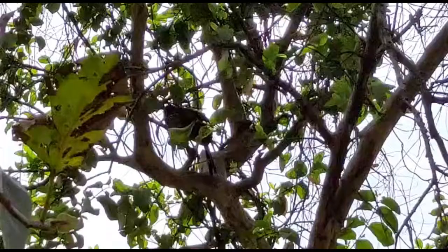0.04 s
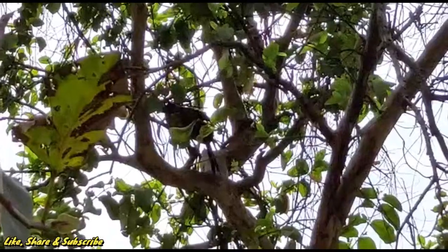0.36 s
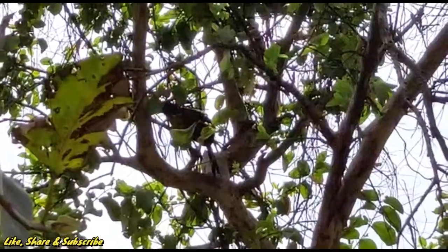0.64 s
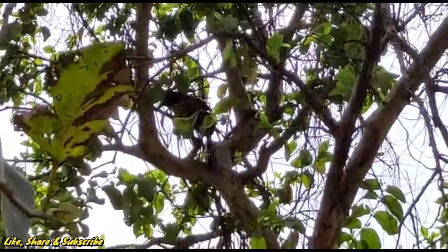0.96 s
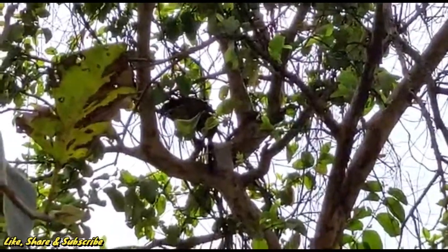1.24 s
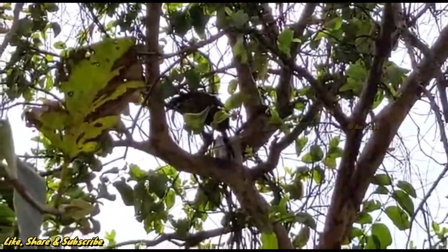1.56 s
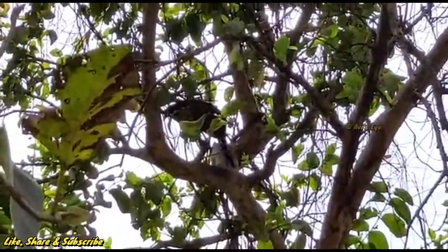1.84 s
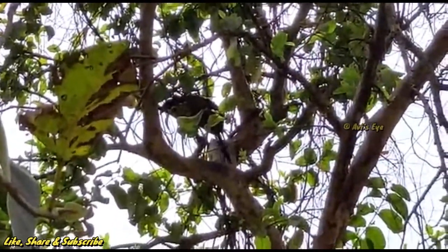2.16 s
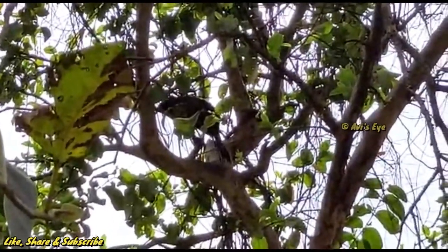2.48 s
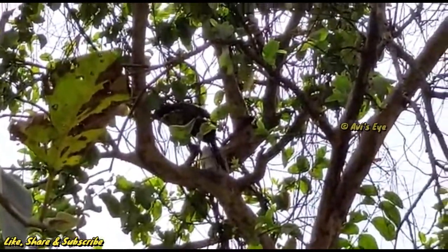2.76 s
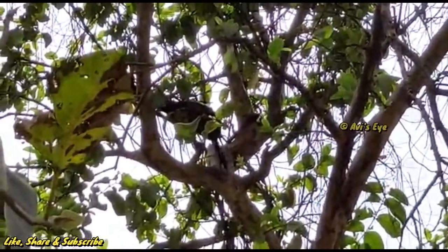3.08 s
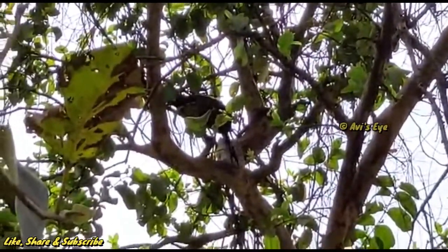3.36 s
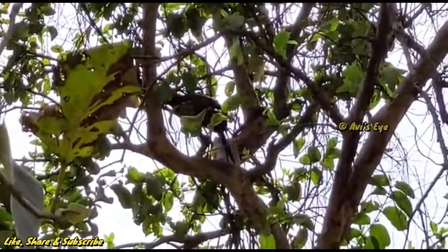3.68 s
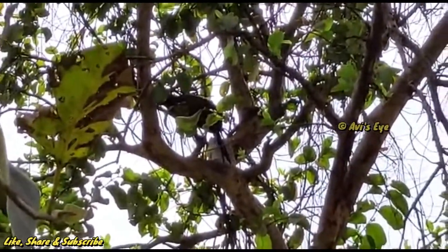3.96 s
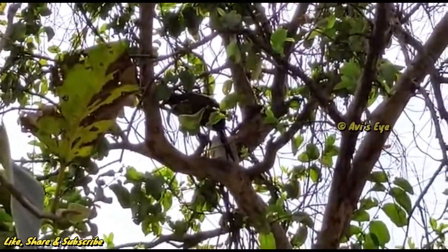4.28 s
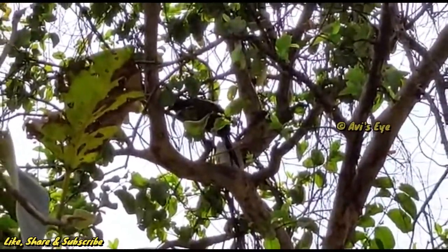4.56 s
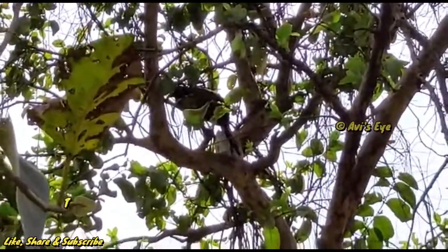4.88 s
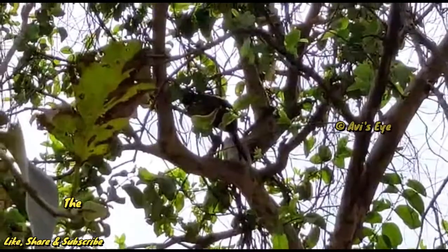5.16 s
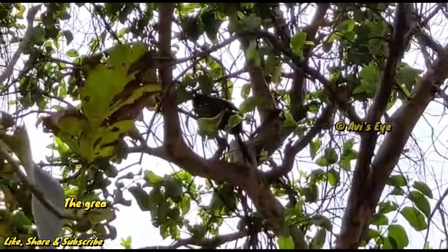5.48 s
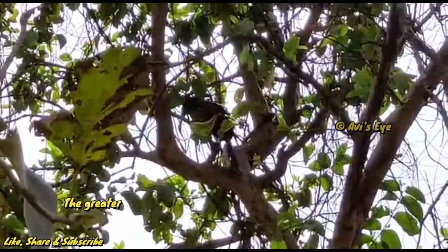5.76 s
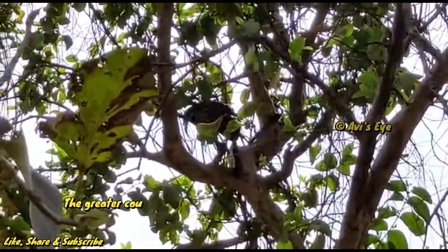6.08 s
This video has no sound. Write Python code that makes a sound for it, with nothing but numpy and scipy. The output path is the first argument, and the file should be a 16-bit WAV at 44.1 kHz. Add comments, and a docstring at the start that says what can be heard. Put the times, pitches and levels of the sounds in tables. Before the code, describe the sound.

Five low, evenly spaced bird hoots sound outdoors above a soft wash of traffic and thin twittering.

```python
"""A steady wash of city traffic fades in, with an idling engine, faint horns and a thin high hiss.
Small birds chip further off, and far twittering and faint insect tones come up behind them.
From 1.3 to 3 s a coucal in a tree gives five deep, almost pure hoots from its swollen throat, each
dipping in pitch and rising again; ground and house walls throw them back, so they beat against their
own echoes. At 4.5 s a small bird rasps one scolding note, and the street carries on."""
import sys
import numpy as np
from scipy import signal
from scipy.fft import rfft, irfft
from scipy.io import wavfile
from scipy.ndimage import uniform_filter1d

SR = 44100
rng = np.random.default_rng(int(sys.argv[2]) if len(sys.argv) > 2 else 0)


def transcribe(signal):
    """Save signal, clipped to [-1, 1], as a 16-bit WAV file at the path in sys.argv[1]."""
    frames = np.atleast_2d(signal).T
    limited = np.clip(frames, -1, 1)
    pcm = np.round(limited * 32767).astype(np.int16)
    wavfile.write(sys.argv[1], SR, pcm)


N = 270333
T = np.arange(N) / SR


def undb(db):
    """Decibels to gain."""
    return 10 ** (np.asarray(db) / 20)


def unit(x):
    """Scale to rms 1."""
    return x / np.sqrt(np.mean(x ** 2) + 1e-20)


def curves(rows):
    """One automation curve for each column after the first, which is time in seconds."""
    times, *columns = np.transpose(rows)
    return [np.interp(T, times, column) for column in columns]


def wander(rate_hz):
    """Smooth random modulation of rms 1, rolling off above `rate_hz`."""
    hz = np.arange(N // 2 + 1) * SR / N
    return unit(irfft(rfft(rng.standard_normal(N)) * np.exp(-.5 * (hz / rate_hz) ** 2), N))


def noise(colour):
    """Noise of rms 1, shaped by an EQ curve of (Hz, dB) points."""
    points, db = np.transpose(colour)
    hz = np.arange(N // 2 + 1) * SR / N + 1
    gain = undb(np.interp(np.log(hz), np.log(points), db, left=-np.inf, right=-np.inf))
    return unit(irfft(rfft(rng.standard_normal(N)) * gain, N))


def sine(hz):
    """A sine oscillator that follows a pitch curve."""
    return np.sin(2 * np.pi * np.cumsum(hz) / SR)


def swell(start, length, edge):
    """A note's envelope, whose attack and release each take the share `edge` of its length."""
    progress = (T - start) / length
    ramp = np.clip(np.minimum(progress, 1 - progress) / edge, 0, 1)
    return np.sin(np.pi / 2 * ramp) ** 2


def reverb(x, t60, build_s):
    """Diffuse sound from leaves and house fronts: it builds up, then dies away."""
    t = T[:SR * 2]
    build = 1 - np.exp(-(t / build_s) ** 2)
    tail = rng.standard_normal(len(t)) * np.exp(-np.log(1000) * t / t60) * build
    return signal.fftconvolve(x, tail / np.sqrt(np.sum(tail ** 2)))[:N]


def flock(centre_hz, spread_hz, per_second, db, note_s=.022, glide=.052, spread_db=3):
    """Many tiny gliding notes at random moments, each with its own pitch and strength."""
    notes = np.zeros(N + SR)
    starts = rng.integers(0, N, size=1000)[:int(per_second * N / SR)]
    chance = rng.standard_normal(size=(1000, 4))
    for start, (pitch, slope, length, strength) in zip(starts, chance):
        progress = np.linspace(0, 1, int(SR * note_s * np.exp(.63 * length)))
        hz = (centre_hz + spread_hz * pitch) * (1 + glide * slope * (progress - .5))
        notes[start:start + len(hz)] += undb(spread_db * strength) * np.sin(np.pi * progress) * sine(hz)
    return undb(db) * unit(notes[:N])


def air():
    """A very faint, even hiss at the top of the spectrum."""
    return undb(-87.5) * noise([(7000, 10.5), (8500, 0), (10000, 5), (12000, 1), (16000, -4)])


# EQ of the high hiss. Each row: frequency in Hz, gain in dB.
HISS_EQ = [(4500, -38), (5350, -3.5), (5700, 3.5), (6250, 13), (6600, 6.5), (6900, -28.5), (7400, -34),
           (7900, -47)]
# Fader ride on the hiss and its twittering. Each row: time in seconds, gain in dB.
HISS_RIDE = [(0.2, -69.5), (0.28, -62.5), (0.76, -69), (0.84, -60), (0.92, -70), (1.08, -59.5),
             (2.68, -66.0), (2.84, -62), (3.8, -68), (3.88, -63.5), (4.04, -65), (5.0, -62.0), (5.32, -72),
             (5.48, -59), (5.64, -63), (5.96, -57.5), (6.08, -62)]


def high_hiss():
    """A thin, flickering band of hiss and tiny notes that swell together."""
    ride_db, = curves(HISS_RIDE)
    notes = flock(centre_hz=6120, spread_hz=270, per_second=110, db=-2.5)
    twitter = reverb(notes, t60=.064, build_s=.003)
    hiss = undb(-5.5 + 1.3 * wander(10)) * noise(HISS_EQ)
    return undb(ride_db) * (hiss + twitter)


def insects():
    """Two thin, wavering high tones that come up behind the traffic."""
    tones = sum(wander(18) * sine(np.full(N, hz)) for hz in (3225, 3450))
    return undb(np.interp(T, [1, 1.8], [-78, -65])) * tones


# Far flocks. Each row: centre pitch in Hz, pitch spread in Hz, notes a second, relative level in dB.
FLOCKS = [(3273, 190, 42, -70), (4310, 560, 45, -78.5), (6900, 230, 14, -82.5)]


def far_chorus():
    """Faint twittering from far trees, growing louder over the first second or so."""
    ride_db = np.interp(T, [.5, 1.4, 6], [-7, 0, 1])
    twitter = sum(flock(*row) for row in FLOCKS)
    return undb(ride_db) * reverb(twitter, t60=.3, build_s=.0018)


# Distant horns and brake squeals. Each row: start in seconds, length in seconds, pitch in Hz,
# relative level in dB.
HORNS_AND_BRAKES = [(0.11, 0.46, 2890, -60), (1.14, 0.57, 737, -55.5), (1.635, 0.28, 763, -57.5),
                    (2.102, 0.19, 860, -64), (3.24, 0.89, 823, -63), (4.0, .7, 843, -66),
                    (4.548, 1.14, 350.9, -58.5), (5.598, 0.93, 1883, -51.5)]


def horns_and_brakes():
    """Far tones that flutter on their way through the streets."""
    flutter = 1 + .012 * wander(25)
    tones = sum(undb(db) * swell(start, length, edge=.13) * sine(hz * flutter)
                for start, length, hz, db in HORNS_AND_BRAKES)
    return undb(-4.5) * tones + undb(-4) * reverb(tones, t60=1.0, build_s=.0089)


# Fader rides on the traffic bed. Each row: time in seconds, then rumble, roar and tyre gains in dB.
TRAFFIC_RIDES = [(0.2, -57.5, -66.5, -67), (0.36, -50.5, -58, -57), (1.64, -47.0, -55.5, -50.5),
                 (1.96, -50.5, -54, -51), (3.64, -51.5, -60.5, -54.0), (3.8, -52, -58.5, -53.5),
                 (4.52, -53, -61.5, -53.5), (6.08, -53, -56, -49.5)]
# EQs of engine rumble, road roar and tyre noise. Each row: frequency in Hz, gain in dB.
RUMBLE_EQ = [(20, -31.5), (45, -17), (70, -11), (100, -3.5), (135, 1.5), (170, -3.5), (210, -9.5),
             (330, -11.5), (480, -23.5), (800, -50.5)]
ROAR_EQ = [(200, -19), (400, -2.5), (600, -2.5), (780, -1), (950, -5.5), (1250, -1), (1700, -15.5),
           (2600, -45)]
TYRE_EQ = [(900, -30), (1400, -2.5), (1900, 5), (2200, 0), (2600, -3), (2950, 0.5), (3250, -8),
           (3550, -16.5), (3750, -22.5), (4400, -30), (5200, -33), (7300, -38.5), (8000, -36.5)]


def traffic():
    """Engines rumble, the road roars and tyres hiss, each wavering a little."""
    rumble_db, roar_db, tyre_db = curves(TRAFFIC_RIDES)
    rumble = undb(rumble_db - .8 + .7 * wander(8)) * noise(RUMBLE_EQ)
    roar = undb(roar_db + .32 + .5 * wander(5)) * noise(ROAR_EQ)
    tyres = undb(tyre_db - .96 + wander(7.3)) * noise(TYRE_EQ)
    return rumble + roar + tyres


# Fader ride on the idling engine. Each row: time in seconds, gain in dB.
ENGINE_RIDE = [(.15, -43.5), (.6, -63), (1.9, -65), (2.3, -51), (3.1, -53), (3.7, -57.5), (6.1, -72.5)]


def idling_engine(firing_hz=102.7):
    """A nearer engine hums around its firing rate and comes and goes in level."""
    ride_db, = curves(ENGINE_RIDE)
    level = undb(ride_db + 2.5 * wander(7))
    return level * sine(firing_hz * (1 + .04 * wander(9)))


# Small birds' chips. Each row: start in seconds, length in seconds, opening pitch in Hz,
# rasp width in Hz, relative level in dB.
CHIPS = [(0.271, 0.064, 4890, 50, -60), (0.596, 0.056, 3220, 119, -58), (0.653, 0.031, 4830, 130, -61.5),
         (1.722, 0.068, 4410, 202, -65.5), (1.756, 0.03, 3644, 82, -48.5), (2.092, 0.039, 6980, 280, -58.5),
         (2.123, 0.094, 4160, 170, -61), (2.538, 0.048, 4130, 150, -63), (2.879, 0.033, 6860, 202, -52),
         (2.956, 0.058, 4000, 132, -60.5), (3.107, 0.065, 5290, 170, -58), (3.114, 0.034, 4320, 297, -56),
         (3.381, 0.032, 3880, 250, -57), (3.381, 0.126, 5580, 190, -51), (3.401, 0.087, 4780, 129, -55),
         (3.835, 0.044, 6110, 245, -55), (5.872, 0.046, 6000, 260, -50.5)]


def chip(start, length, from_hz, rasp_hz, db, fall=.04, edge_s=.014):
    """A short falling whistle, made hoarse by fast pitch jitter."""
    hz = from_hz * np.interp(T, [start, start + length], [1, 1 - fall])
    jitter = unit(uniform_filter1d(rng.standard_normal(N), size=24))
    return undb(db) * swell(start, length, edge=edge_s / length) * sine(hz + rasp_hz * jitter)


def small_birds():
    """Chips from neighbouring trees, smeared by the foliage."""
    calls = sum(chip(*row) for row in CHIPS)
    return undb(-1) * calls + reverb(calls, t60=.28, build_s=.006)


# Resonances of the scolding note. Each row: centre in Hz, width in Hz, relative level in dB.
SCOLD_RESONANCES = [(3410, 600, -6.5), (4040, 360, -6.5), (4640, 350, -12.5), (6220, 800, -1),
                    (6700, 380, 2), (7300, 280, 0.5)]


def scold(start=4.481, length=.052):
    """A harsh burst of sound through the resonances of a small throat and beak."""
    throat = sum(undb(db) * wander(width / 2) * sine(np.full(N, hz))
                 for hz, width, db in SCOLD_RESONANCES)
    note = undb(-40.5) * swell(start, length, edge=.35) * unit(throat)
    return note + reverb(note, t60=.26, build_s=.015)


def house_fronts(voice, count=40, first_s=.1, gap_s=.013, hold_s=.18, t60=.53, low_cut_hz=461.5):
    """One echo from each front down the street; they hold their strength a while, then die away."""
    # Lower pitches bend round the fronts and come back weaker.
    thinned = signal.sosfilt(signal.butter(6, low_cut_hz, "high", fs=SR, output="sos"), voice)
    delays = first_s + gap_s * (np.arange(count) + rng.uniform(-.5, .5, count))
    gains = undb(-12) * np.exp(-np.log(1000) * np.maximum(delays - hold_s, 0) / t60)
    return sum(gain * np.interp(T - delay, T, thinned, left=0) for delay, gain in zip(delays, gains))


# Early reflections. Each row: delay in seconds, gain in dB.
EARLY_REFLECTIONS = [(0.00523, 2.3), (0.01098, -0.6), (0.02057, -5.2), (0.03734, -11.6), (0.05249, -17.3),
                     (0.06128, -15.6), (0.07245, -13.1)]


def ground_and_walls(voice):
    """The ground and the closest walls throw the voice back while it is still sounding."""
    return sum(undb(db) * np.interp(T - delay, T, voice, left=0) for delay, db in EARLY_REFLECTIONS)


# The push of air in one hoot. Each row: share of its length, amplitude from 0 to 1, pitch bend in Hz.
AIR_PUSH = [(0.06, 0.0, 47.0), (0.15, 0.16, 34.0), (0.3, 0.85, 28.0), (0.45, 0.58, -39.0),
            (0.6, 0.63, -44.0), (0.75, 1.0, -20.0), (0.9, 0.64, 6.0), (1.0, 0.0, -14.0)]


def hoot(start, length, early_hz, middle_hz, late_hz, db):
    """The swollen throat passes nearly a pure tone, which opens high, dips and climbs back."""
    progress = (T - start) / length
    share, strength, bend_hz = np.transpose(AIR_PUSH)
    base_hz = np.interp(progress, [.2, .55, 1], [early_hz, middle_hz, late_hz])
    hz = uniform_filter1d(base_hz + np.interp(progress, share, bend_hz), size=735)
    push = uniform_filter1d(np.interp(progress, share, strength), size=441)
    octave = undb(-50.5) * push ** 2 * sine(2 * hz)
    return undb(db) * (push * sine(hz) + octave)


# The coucal's phrase. Each row: start in seconds, length in seconds, then early, middle and late
# pitch in Hz before the bend, dry level in dB.
HOOTS = [(1.261, .137, 375, 428, 426, -16.4), (1.645, .14, 437, 458, 451, -10.1),
         (2.043, .15, 439, 446, 447, -10.8), (2.438, .157, 435, 436, 439, -10.9),
         (2.823, .17, 433, 428, 431, -12.5)]


def coucal():
    """Gliding hoots overlap their own echoes and throb; the street rings on softly."""
    voice = sum(hoot(*row) for row in HOOTS)
    return voice + ground_and_walls(voice) + house_fronts(voice)


def scene(high_cut_hz=7350):
    """The mono mix from under the tree; little but faint air lies above the birds' band."""
    hiss, top_air = high_hiss(), air()
    wildlife = coucal() + small_birds() + scold() + far_chorus() + insects()
    street = traffic() + idling_engine() + horns_and_brakes()
    high_cut = signal.ellip(8, .2, 40, high_cut_hz, fs=SR, output="sos")
    return (signal.sosfilt(high_cut, hiss + street + wildlife) + top_air)[None]


# Master fade-in. Each row: time in seconds, gain in dB.
FADE_IN = [(.125, -70), (.158, -11), (.2, 1)]


def record(dry, high_cut_hz=15700):
    """The mix fades in quickly and the very top is cut off."""
    fade_db, = curves(FADE_IN)
    high_cut = signal.ellip(8, .2, 60, high_cut_hz, fs=SR, output="sos")
    return signal.sosfilt(high_cut, dry * undb(fade_db))


dry = scene()
out = record(dry)
transcribe(out)
```